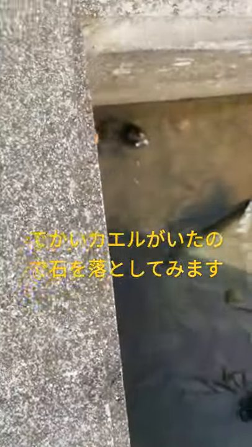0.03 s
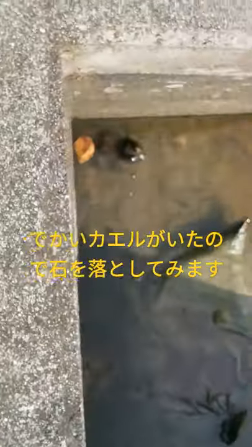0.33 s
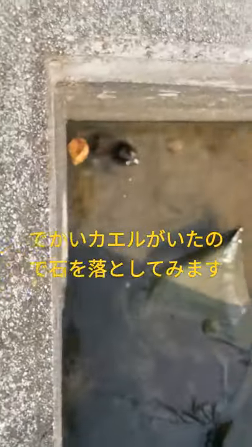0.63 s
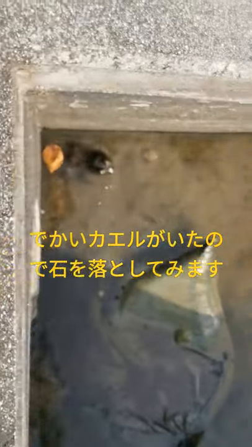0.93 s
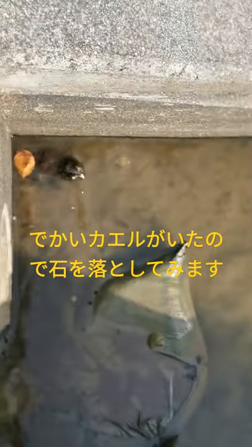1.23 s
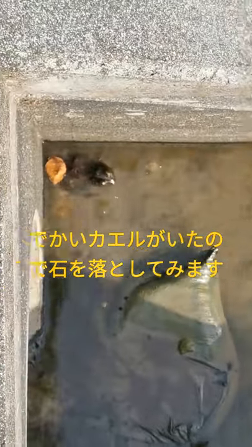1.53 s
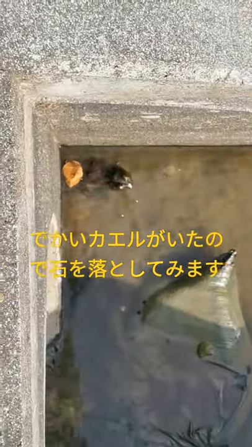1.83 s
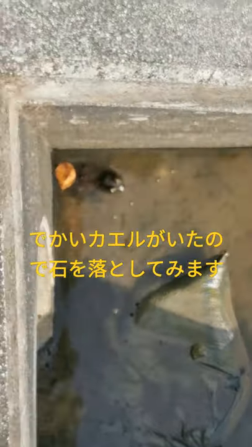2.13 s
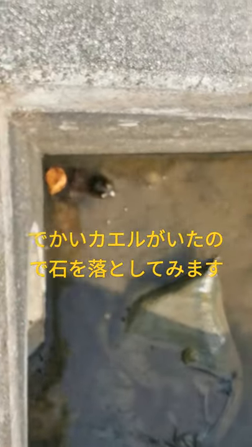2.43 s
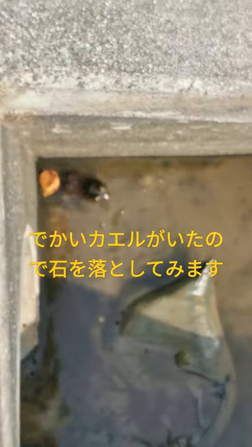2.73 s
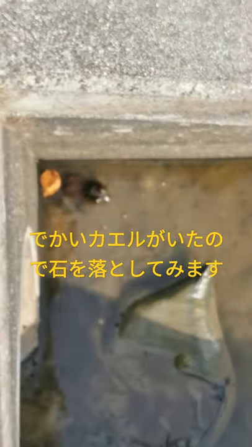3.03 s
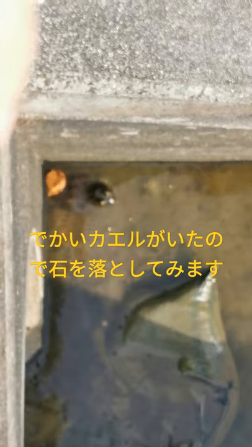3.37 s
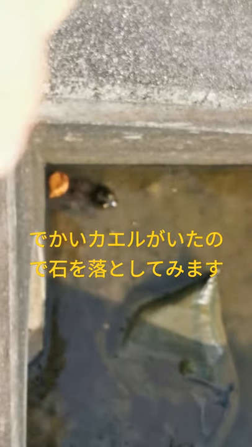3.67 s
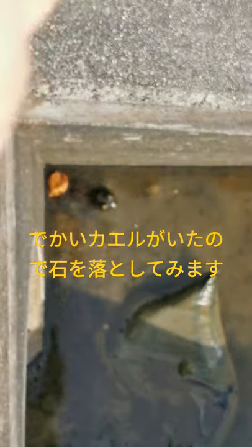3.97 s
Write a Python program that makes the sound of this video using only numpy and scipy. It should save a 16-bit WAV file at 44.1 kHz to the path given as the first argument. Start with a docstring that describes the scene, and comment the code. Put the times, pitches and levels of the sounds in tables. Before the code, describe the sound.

A light breeze buffets the microphone with low rumbling and soft thumps, briefly on the right, then mostly left, strongest around 2 to 2.4 seconds and near 3.9. Faint birds chirp throughout, more to the right, with quick trills from 0.4 to 1 second and from 3.3 on. A sharp chirp comes at 1.8 and a clearer note at 3.4. Quiet distant rumble and thin hiss lie underneath.

```python
"""Breeze and birds by a basin.

Outdoors beside a concrete basin of still water, a light breeze buffets the microphone ports, mostly
the left: low turbulence, thumps of single eddies, brief flurries. Small birds some way off, louder
on the right, whistle trills and gliding chirps that the surroundings scatter back. Behind them lie
a haze of far birds, a quiet far rumble and a thin hiss whose colour shifts."""
import sys
import numpy as np
from scipy import signal
from scipy.fft import rfft, irfft
from scipy.io import wavfile
from scipy.ndimage import uniform_filter1d

SR = 44100
rng = np.random.default_rng(int(sys.argv[2]) if len(sys.argv) > 2 else 0)


def pcm_store(signal):
    """Save signal as 16-bit PCM."""
    levels = np.round(np.clip(np.atleast_2d(signal), -1, 1) * 32767)
    wavfile.write(sys.argv[1], SR, levels.astype(np.int16).T)


N = 176400
TIME = np.arange(N) / SR
HZ = np.maximum(np.arange(N // 2 + 1) * SR / N, 1)
LEFT_LEAD_S, ROUGHNESS_HZ = 0.00029, 171

# Wind strength per port: (time [s], level [dB])
GUSTS_LEFT = [(0, -49), (.08, -42.5), (.14, -46), (.29, -43), (.36, -56), (.48, -55), (.57, -40.5),
              (.68, -46), (.76, -40), (.82, -55), (.92, -46), (1.08, -45.5), (1.2, -43.5), (1.26, -59),
              (1.33, -53.5), (1.43, -42.5), (1.56, -59.5), (1.65, -43.5), (1.72, -49.5), (1.86, -47.5),
              (1.93, -56), (1.99, -47), (2.04, -38.5), (2.15, -45), (2.23, -39.5), (2.35, -37.5),
              (2.44, -49.5), (2.52, -43.5), (2.6, -51.5), (2.82, -47.5), (2.9, -54.5), (3.06, -55),
              (3.12, -45), (3.17, -50.5), (3.22, -44.5), (3.3, -46), (3.57, -41.5), (3.65, -43.5),
              (3.73, -48), (3.8, -39), (3.92, -37), (4, -50.5)]
GUSTS_RIGHT = [(0, -31.5), (.05, -34.5), (.12, -41.5), (.19, -41), (.27, -54), (.4, -53), (.52, -60),
               (1.6, -70), (1.78, -57), (2.06, -55), (2.12, -59), (2.18, -46), (2.3, -79), (4, -80)]
# Gust body and fine eddies: (frequency [Hz], relative level [dB])
GUST_SPECTRUM = [(12, -17), (28, -1.5), (55, 3), (90, -1.5), (130, -8.5), (190, -23.5), (300, -36),
                 (500, -50), (1200, -71)]
EDDY_SPECTRUM = [(50, -21), (110, 0.5), (160, 3.5), (240, -9.5), (350, -18), (600, -37.5), (1500, -52.5)]


def wind(gusts, evenness=0.54, lump_s=0.073, eddy_db=-46, reference_db=-36, growth_db_per_db=1.49):
    """Low turbulence at one port; finer eddies come in patches and grow faster than the gust."""
    gust_db = curve(gusts)
    body = rms_one(colour(rng.standard_normal(N), GUST_SPECTRUM))
    eddies = rms_one(colour(rng.standard_normal(N), EDDY_SPECTRUM))
    power = uniform_filter1d(body ** 2, int(lump_s * SR)) + 1e-6
    body = rms_one(body / power ** (evenness / 2))
    patches_db = 3.5 * band_noise(0, width_hz=14)
    fine_db = eddy_db + growth_db_per_db * (gust_db - reference_db) + patches_db
    return from_db(gust_db) * body + from_db(fine_db) * eddies


# Eddy thumps: (centre [s], peak [dB], half length [s], port)
EDDY_THUMPS = [(0.0167, -26, 0.0016, "right"), (0.038, -30.5, 0.0022, "right"),
               (.561, -41.5, 0.0036, "left"), (0.58, -38.5, 0.0028, "left"), (0.734, -36, 0.0023, "left"),
               (0.755, -34, 0.0041, "left"), (1.061, -32.5, 0.002, "left"), (1.112, -31, 0.0025, "left"),
               (1.209, -31, 0.0028, "left"), (1.309, -38.5, 0.0018, "left"), (1.417, -32, 0.0022, "left"),
               (1.644, -38, 0.0015, "left"), (1.665, -32.5, 0.0021, "left"), (1.775, -33.5, 0.0028, "left"),
               (1.841, -31, 0.0019, "left"), (2.017, -27.5, 0.0021, "left"), (2.034, -37, 0.002, "left"),
               (2.222, -36, 0.0017, "left"), (2.291, -29.5, 0.0028, "left"), (2.304, -29.5, 0.0029, "left"),
               (2.364, -24.5, 0.0028, "left"), (2.966, -35, 0.003, "left"), (3.464, -37.5, 0.0019, "left"),
               (3.557, -39.5, 0.0018, "left"), (3.583, -35, 0.0018, "left"), (3.658, -26.5, 0.0019, "left"),
               (3.772, -35.5, .0021, "left"), (3.851, -27, 0.0025, "left"), (3.892, -24.5, 0.0021, "left")]


def buffets():
    """Each passing eddy pulls, then pushes, on its port."""
    ports = {"left": np.zeros(N), "right": np.zeros(N)}
    for centre_s, db, half_s, port in EDDY_THUMPS:
        offset = np.clip((TIME - centre_s) / half_s, -10, 10)
        ports[port] += from_db(db) * offset * np.exp((1 - offset ** 2) / 2)
    return np.array([ports["left"], ports["right"]])


# Bursts of fine eddies: (centre [s], length [s], frequency [Hz], left [dB], right [dB])
EDDY_BURSTS = [(0.02, 0.12, 215, -64, -43), (2.039, 0.11, 150, -36, -74), (2.26, 0.19, 126, -53.5, -72)]


def flurries(width_hz=112, lump_s=0.0268):
    """The sharpest gusts break into a short, higher flutter."""
    out = np.zeros((2, N))
    for centre_s, length_s, hz, left_db, right_db in EDDY_BURSTS:
        eddies = filtered(rng.standard_normal(N), np.exp(-((HZ - hz) / width_hz) ** 2))
        eddies /= np.sqrt(uniform_filter1d(eddies ** 2, int(lump_s * SR)) + 1e-12)
        out += from_db([[left_db], [right_db]]) * swell(centre_s, length_s) * eddies
    return out


def trill_note(peak_s, hz, db, flutter, attack_s=0.008, release_s=0.013, fall_hz_per_s=19800):
    """A whistle that starts quickly and slides down as it fades."""
    age_s = np.clip(TIME - peak_s, -0.1, 0.1)
    envelope = np.exp(-(age_s / np.where(age_s < 0, attack_s, release_s)) ** 2)
    phase = 2 * np.pi * (hz * age_s - fall_hz_per_s * age_s ** 2 / 2)
    return from_db(db) * envelope * np.sin(phase + flutter)


# Two trill runs: (time [s], peak [dB])
TRILL_NOTES = [(.35, -62.5), (.422, -60.5), (0.493, -62), (0.558, -61.5), (0.628, -59), (0.691, -65),
               (0.761, -60), (.826, -61), (.89, -61), (0.964, -69), (0.996, -67), (3.316, -68),
               (3.387, -64), (3.458, -61), (3.524, -62), (3.591, -63), (3.66, -62.5), (3.722, -62),
               (3.786, -60), (3.848, -61), (3.915, -68), (3.95, -66), (3.99, -63)]


def trilling_bird(pitch_hz=3936, spread_hz=35):
    """Falling notes, about fifteen a second, no two alike; the first run trails into a twitter."""
    flutter = band_noise(0, ROUGHNESS_HZ)
    out = np.zeros(N)
    for peak_s, db in TRILL_NOTES:
        out += trill_note(peak_s, pitch_hz + spread_hz * rng.standard_normal(), db, 0.5 * flutter)
    return out + twitter(0.85 * flutter)


def twitter(flutter, start_s=1.031, pairs=7, step_s=0.1175, gap_s=0.034, hz=3840, fade_db_per_s=2.5):
    """Faint paired notes, slowly fading."""
    out = np.zeros(N)
    for pair in range(pairs):
        for lag_s, note_db in ((0, -62.8), (gap_s, -64.8)):
            age_s = pair * step_s + lag_s
            db = note_db - fade_db_per_s * age_s + 0.6 * rng.standard_normal()
            out += trill_note(start_s + age_s, hz, db, flutter)
    return out


# Chirps: (centre [s], length [s], start pitch [Hz], end pitch [Hz], peak [dB], roughness [0-1])
CHIRP_GLIDES = [(0.166, 0.024, 2350, 2740, -64, 0.34), (0.241, 0.029, 1960, 2980, -58, 0.2),
                (0.316, 0.044, 1500, 3050, -55.5, 0.24), (.348, 0.037, 2400, 2660, -60, .4),
                (.505, 0.047, 2035, 2340, -62, 0.5), (0.572, 0.18, 2770, 3190, -63.5, 0.9),
                (0.599, 0.012, 2750, 1880, -55, 0.15), (.645, .04, 2106, 2470, -59, 0.2),
                (0.662, 0.0303, 2300, 3300, -58.5, 0.28), (0.794, 0.029, 1400, 1890, -64, 0.3),
                (0.708, 0.4, 2750, 2750, -66.5, .8), (1.72, 0.031, 2000, 2350, -62, 0.2),
                (1.815, 0.004, 3200, 2220, -44, 0.23), (1.836, 0.1, 2930, 3130, -64.5, 0.6),
                (1.887, 0.067, 3030, 3060, -62.5, 0.1), (1.953, 0.03, 2100, 2440, -57.5, 0.3),
                (1.968, 0.035, 2450, 3200, -59.5, 0.34), (2.578, 0.02, 2110, 2550, -63, .3),
                (2.876, .02, 2500, 1950, -59.5, 0.4), (3.142, 0.21, 2850, 3240, -63, 0.25),
                (3.237, 0.0403, 1950, 3020, -56.5, .25), (3.617, 0.04, 3150, 3010, -61, 0.2),
                (3.647, 0.087, 2920, 2840, -62, 0.2), (3.71, 0.086, 2870, 2810, -68, 0.45)]


def chirping_birds(flutter_rad=3.4):
    """Whistled glides, made slightly hoarse by phase flutter."""
    flutter = flutter_rad * band_noise(0, ROUGHNESS_HZ)
    out = np.zeros(N)
    for centre_s, length_s, start_hz, end_hz, db, roughness in CHIRP_GLIDES:
        progress = np.clip((TIME - centre_s) / length_s + 0.5, 0, 1)
        phase = 2 * np.pi * np.cumsum(start_hz + (end_hz - start_hz) * progress) / SR
        out += from_db(db) * swell(centre_s, length_s) * np.sin(phase + roughness * flutter)
    return out


def pip(centre_s=3.39, length_s=0.03, hz=3237, scoop_hz=576, scoop_s=0.0042, db=-44.5, octave_db=-16.5):
    """A nearer bird's clean note scoops up to pitch, with a weak octave and one quick echo."""
    age_s = np.maximum(TIME - centre_s + length_s / 2, 0)
    pitch_hz = hz - scoop_hz * np.exp(-np.minimum(age_s / scoop_s, 20))
    phase = 2 * np.pi * np.cumsum(pitch_hz) / SR
    tone = np.sin(phase) + from_db(octave_db) * np.sin(2 * phase)
    call = from_db(db) * swell(centre_s, length_s) * tone
    return call + from_db(-12) * delayed(call, delay_s=0.02)


def scatter(x, echo_db=-8, t60_s=0.37):
    """A diffuse tail thrown back by the surroundings."""
    tail = rng.standard_normal(SR) * from_db(-60 * TIME[:SR] / t60_s)
    tail /= np.sqrt(np.sum(tail ** 2))
    return from_db(echo_db) * signal.fftconvolve(x, tail)[:N]


# Far birds: (time [s], level [dB])
CHATTER_ENVELOPE = [(0, -68.5), (.35, -71), (.6, -69.5), (.95, -67), (1.3, -72), (1.7, -73), (2.2, -74),
                    (2.55, -70.5), (3.2, -70), (3.6, -69.5), (4, -70.5)]


def chatter(hz=2203, width_hz=770, flicker_db=1.7, flicker_hz=25):
    """Many far birds blur into a flickering haze."""
    db = curve(CHATTER_ENVELOPE) + flicker_db * band_noise(0, flicker_hz)
    return from_db(db) * band_noise(hz, width_hz)


# Still air per channel: (frequency [Hz], density [dB/Hz])
AIR_SPECTRUM_LEFT = [(30, -94), (100, -97), (250, -91.5), (490, -104), (600, -99), (800, -103),
                     (1150, -103), (1700, -110), (3300, -114), (3900, -108), (4500, -115), (5100, -115),
                     (5750, -121), (6550, -112), (7400, -120), (8200, -116), (8900, -108.5), (9500, -114),
                     (10300, -126), (13000, -123), (15500, -129)]
AIR_SPECTRUM_RIGHT = [(30, -89), (90, -82), (190, -93.5), (240, -88), (350, -93.5), (490, -99),
                      (600, -92.5), (800, -96), (1200, -95.5), (1600, -101), (2250, -104), (3300, -107),
                      (3900, -102), (4400, -107), (5100, -105.5), (5750, -111.5), (6550, -102),
                      (7000, -105), (7300, -110), (8900, -105), (10200, -114), (11000, -112), (13000, -116),
                      (14200, -122), (15500, -121)]
# Midrange of the far rumble: (time [s], gain [dB])
MIDRANGE_GAIN = [(0, -2), (.5, -1.5), (1.1, 0.5), (1.7, -1), (2.4, 0), (3.2, 0.5), (4, -0.5)]


def air(bass_coherence=0.93, coherence_hz=1430, mid_low_hz=417, mid_high_hz=1420):
    """Far rumble and hiss, alike on both sides in the bass and reaching the left first."""
    left, independent = rng.standard_normal((2, N))
    coherence = bass_coherence / (1 + (HZ / coherence_hz) ** 2)
    shared = filtered(left, coherence * np.exp(-2j * np.pi * HZ * LEFT_LEAD_S))
    right = shared + filtered(independent, np.sqrt(1 - coherence ** 2))
    both = np.array([colour(left, AIR_SPECTRUM_LEFT), colour(right, AIR_SPECTRUM_RIGHT)])
    midrange = filtered(both, (HZ > mid_low_hz) & (HZ < mid_high_hz))
    return both + midrange * (from_db(curve(MIDRANGE_GAIN)) - 1)


# Broad hiss: (frequency [Hz], density [dB/Hz])
HISS_SPECTRUM = [(6000, -135), (8000, -111), (9500, -106), (10150, -109), (10900, -104), (11500, -106),
                 (13200, -106), (14000, -114), (15500, -114.5)]
# Broad hiss, whole and top only: (time [s], gain [dB])
HISS_GAIN = [(0, -9), (.07, -6), (.24, -4), (.33, -13), (.42, -4), (.5, 2.5), (.65, -4), (.72, 0),
             (.95, 0.5), (1.5, 2.5), (1.8, 1.5), (2.25, 2), (2.7, -1.5), (4, -4)]
HISS_TOP_GAIN = [(0, -1), (.62, -4), (.76, 2), (1.3, -0.5), (1.8, -2), (2.2, -3), (2.7, -5.2), (4, -3)]
# Narrow hiss: (start [s], end [s], centre [Hz], width [Hz], level [dB])
PASSING_BANDS = [(0, 0.046, 11400, 2000, -68), (0.394, .45, 7100, 400, -72), (.28, .72, 8850, 400, -79),
                 (.46, .62, 12700, 700, -77), (0.687, 0.87, 12500, 900, -69.5),
                 (.71, 0.864, 13500, 700, -73), (.68, 0.714, 11700, 1600, -68),
                 (0.034, .6, 5700, 1430, -75), (.6, .86, 5900, 2200, -70.5), (.92, 1.58, 10400, 750, -71.5),
                 (1, 1.8, 12950, 700, -79), (1.85, 2.48, 10400, 1600, -70.5), (2.4, 3.95, 9300, 400, -75)]


def shifting_hiss(left_db=-21, top_ramp_hz=(11300, 13300), flicker_db=2.0, flicker_hz=15):
    """Thin hiss, mostly right; its top brightens, then dulls, and narrow bands come and go."""
    hiss = colour(rng.standard_normal(N), HISS_SPECTRUM) * from_db(curve(HISS_GAIN))
    top = filtered(hiss, np.interp(HZ, top_ramp_hz, [0, 1]))
    hiss += top * (from_db(curve(HISS_TOP_GAIN)) - 1)
    for start_s, end_s, hz, width_hz, db in PASSING_BANDS:
        fade_s = 0.019 + 0.072 * (end_s - start_s)
        gate = np.clip(np.minimum(TIME - start_s, end_s - TIME) / fade_s + 0.5, 0, 1)
        gain = from_db(db + flicker_db * band_noise(0, flicker_hz))
        hiss += gain * gate * band_noise(hz, width_hz)
    return np.array([from_db(left_db) * hiss, hiss])


def from_db(db):
    """Decibels to gain."""
    return 10 ** (np.asarray(db) / 20)


def rms_one(x):
    """Scale to unit RMS."""
    return x / np.sqrt(np.mean(x ** 2) + 1e-20)


def curve(points):
    """Breakpoints interpolated at every sample."""
    return np.interp(TIME, *np.transpose(points))


def filtered(x, response):
    """Apply a frequency response given on HZ."""
    return irfft(rfft(x) * response, N)


def colour(white, spectrum):
    """Give unit white noise a spectrum in dB/Hz."""
    hz, db = np.transpose(spectrum)
    return filtered(white, from_db(np.interp(np.log(HZ), np.log(hz), db))) * np.sqrt(SR / 2)


def band_noise(hz, width_hz):
    """Unit noise in one rounded band; at 0 Hz, a random wander."""
    response = 1 / (1 + 2 * ((HZ - hz) / width_hz) ** 2)
    return rms_one(filtered(rng.standard_normal(N), response))


def delayed(x, delay_s):
    """Fractional-sample delay."""
    return np.interp(TIME - delay_s, TIME, x, left=0)


def swell(centre_s, length_s):
    """Raised-cosine rise and fall."""
    return np.cos(np.pi * np.clip((TIME - centre_s) / length_s, -0.5, 0.5)) ** 2


def scene(birds_left_db=-17.5, breeze_fade_in_s=0.004):
    """Wind on the ports; birds, louder on the right; air all round."""
    trill, chirps = trilling_bird(), chirping_birds()
    direct = trill + chirps + pip() + chatter()
    echo_left, echo_right = (scatter(trill) + scatter(chirps) for _ in range(2))
    birds = np.array([from_db(birds_left_db) * (direct + echo_left),
                      delayed(direct, LEFT_LEAD_S) + echo_right])
    breeze = flurries() + buffets() + np.array([wind(GUSTS_LEFT), wind(GUSTS_RIGHT)])
    breeze *= np.minimum(TIME / breeze_fade_in_s, 1)
    return breeze + birds + air() + shifting_hiss()


def record(dry):
    """Steep elliptic low-pass."""
    cutoff_hz = 15720
    return signal.sosfilt(signal.ellip(12, 0.1, 80, cutoff_hz, fs=SR, output="sos"), dry)


dry = scene()
out = record(dry)
pcm_store(out)
```